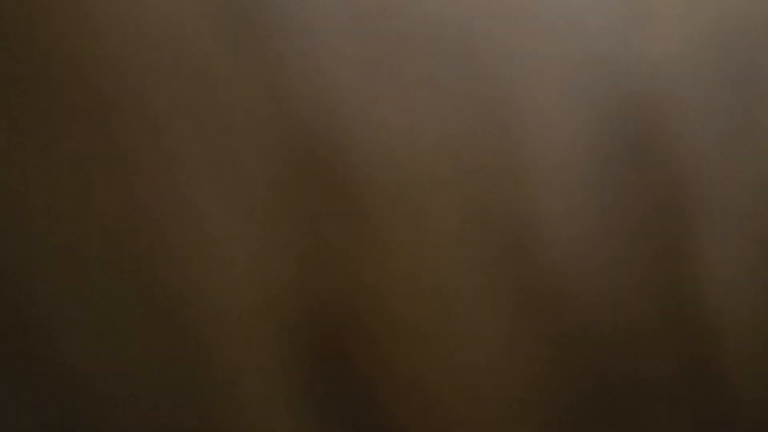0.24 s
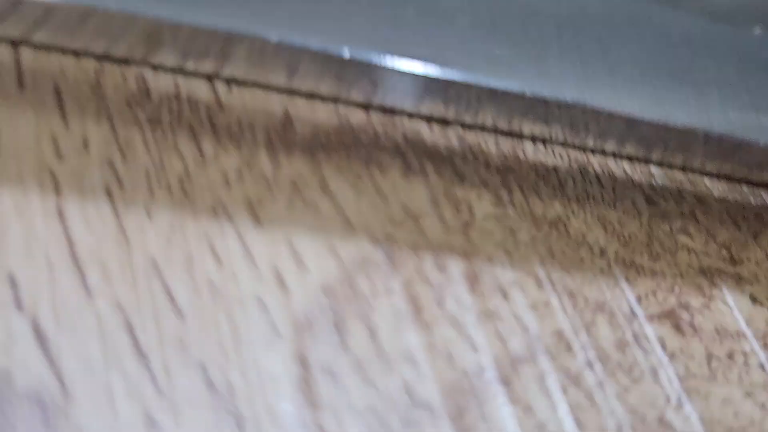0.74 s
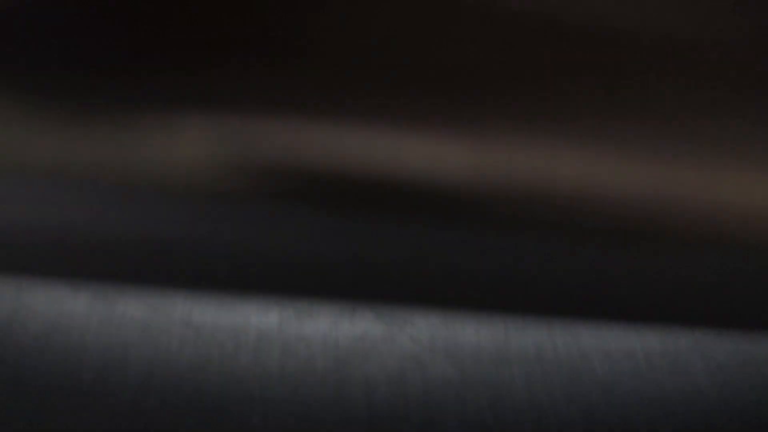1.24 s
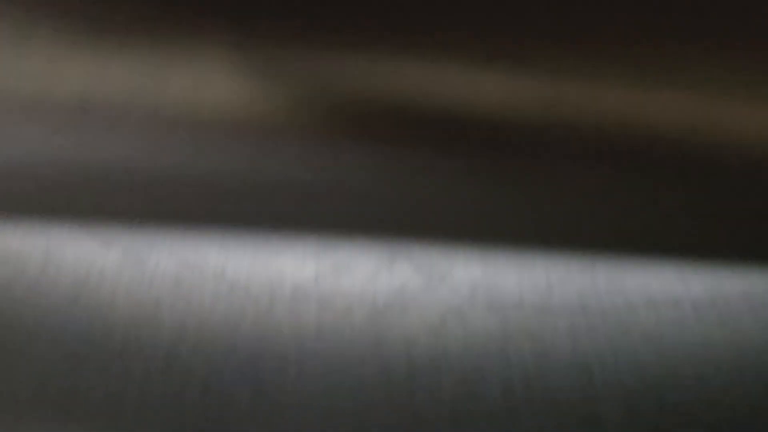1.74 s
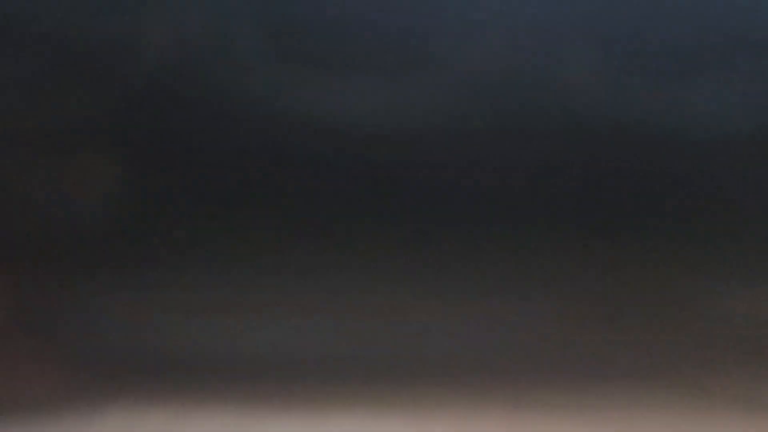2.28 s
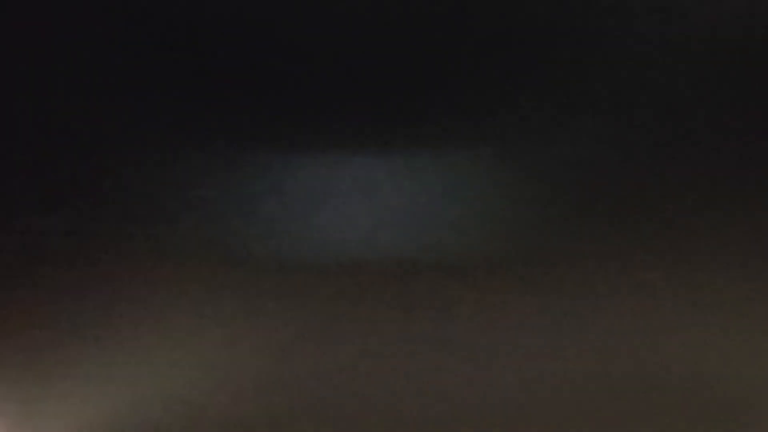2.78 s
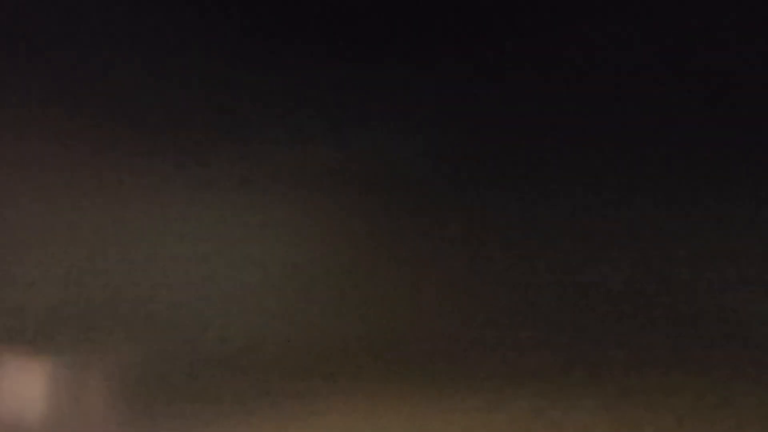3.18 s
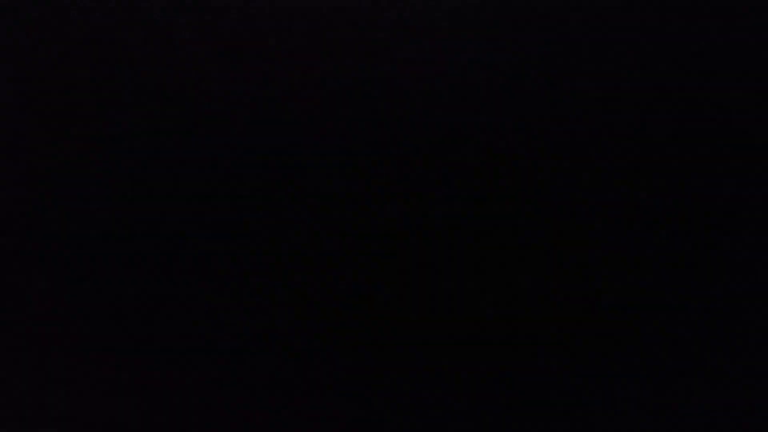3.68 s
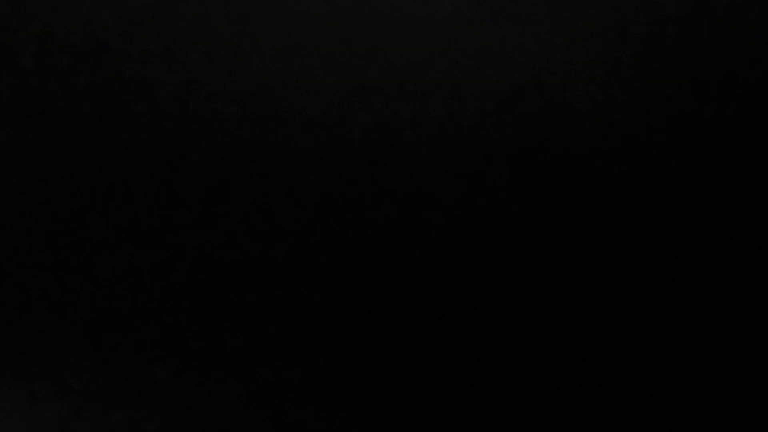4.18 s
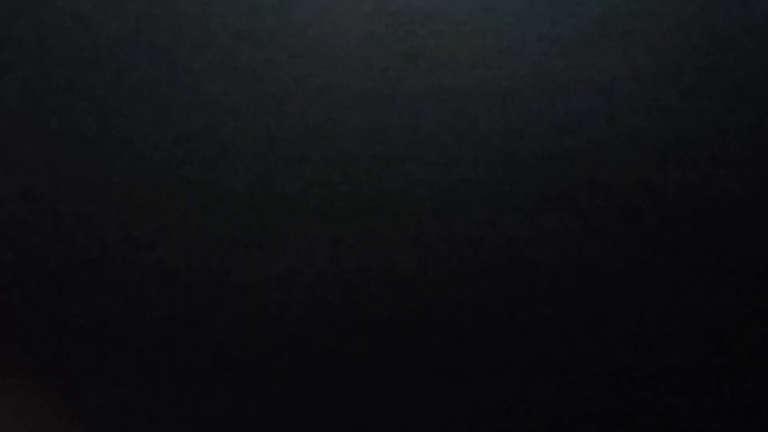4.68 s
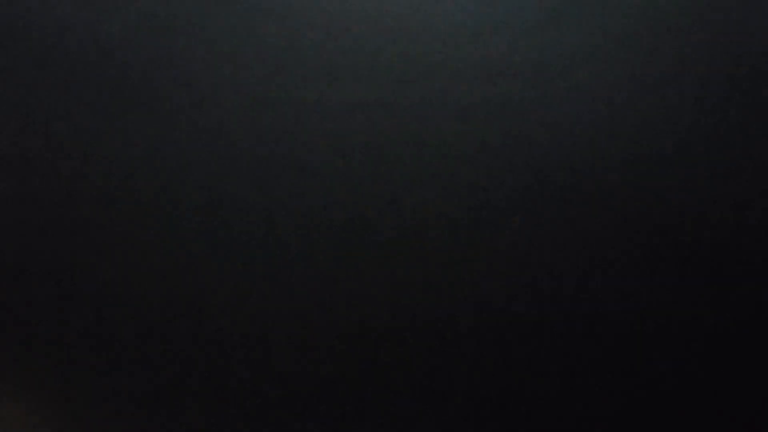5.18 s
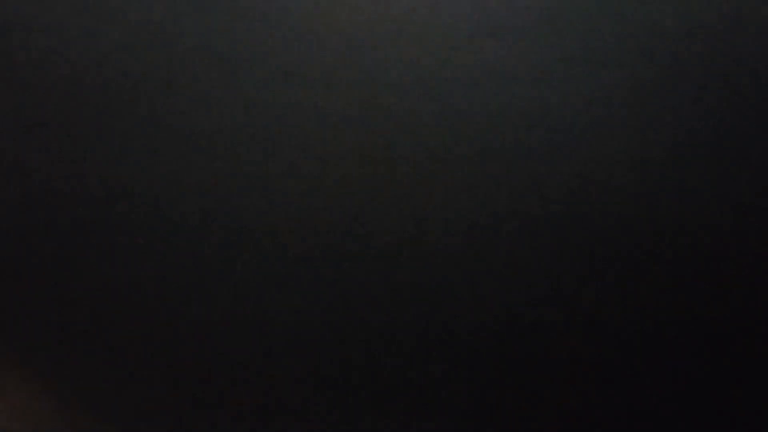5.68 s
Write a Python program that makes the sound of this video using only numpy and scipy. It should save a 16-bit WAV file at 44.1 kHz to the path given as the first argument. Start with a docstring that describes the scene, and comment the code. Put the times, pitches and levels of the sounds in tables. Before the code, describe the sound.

A low, slightly unsteady hum and soft room noise run throughout. From 0 to 0.4 s there is a faint grainy rub and a weak, airy squeak that rises then sinks; a modest hollow knock follows at 0.5 s. Soft strokes lead to a very heavy, close bump with a gritty clack at 1.2 s and a quick cluster of hard clacks around 1.45 s. Light rubbing continues, with a stronger scrape at 2.2 s, another overloading thud at 2.4 s and two bright, hard clacks at 2.6 to 2.7 s. It calms to faint rubbing, with dull bumps and a small rattle of hollow clacks at 3.5 to 3.75 s. Near quiet follows until a light double knock at 4.7 s. A sharp steel snap cracks at 5.04 s, a tiny springy tick comes at 5.55 s, and a crisper, brighter snap at 5.74 s, with short small-room reverberation.

```python
"""A soft rub and an airy squeak over a low hum, then hard bumps and clacks, and at last sharp snaps.
A camera is pushed in close to a metal gear shifter in a small room: friction is grainy noise in the
modes of its case, bumps are damped oscillations, clacks are brief noise exciting the housing's modes.
Then the shifter is moved by hand: its steel pawl snaps, ticks and snaps again, each time as a noise
crack with ringing steel and spring modes, and diffuse decaying noise answers as the room."""
import sys
import numpy as np
from scipy import signal
from scipy.fft import rfft, irfft, next_fast_len
from scipy.io import wavfile
from scipy.ndimage import map_coordinates

SR = 44100
rng = np.random.default_rng(int(sys.argv[2]) if len(sys.argv) > 2 else 0)


def master(y):
    """Save y as 16-bit WAV."""
    cut = np.clip(np.atleast_2d(y).T, -1, 1)
    pcm = np.round(cut * 32767)  # scale
    wavfile.write(sys.argv[1], SR, pcm.astype(np.int16))


N = 261599

# Dull bumps carried through the camera case:
# (time [s], level before colouring [dB], pitch [Hz], ring [cycles], left-right [dB])
BUMPS = [(.439, -32.5, 400, 0.17, 11), (0.5113, -31, 353, 0.38, -1.5), (.768, -43.5, 467, 1.6, 10),
         (1.2122, -1, 482, 0.97, -1.5), (1.232, -13.5, 377, 0.3, -8), (1.4635, -12.5, 500, 0.21, -1.5),
         (1.85, -26, 161, 0.24, 1), (2.4127, -1, 386, 0.46, -5.5), (2.432, -6, 310, 0.23, -4),
         (2.4387, -16.5, 223, 0.74, -8.5), (2.621, -4.5, 246, 0.26, 1), (2.6512, -9.5, 257.4, 0.13, 9.5),
         (3.502, -34.5, 201.6, 0.22, -21), (3.5405, -17, 168, 0.27, -3.5), (3.707, -20.5, 139, 0.11, -10),
         (3.723, -25, 110, 0.42, 14.5), (4.7126, -33, 303.5, 0.27, -3.5), (5.0382, -16.5, 368.8, 0.24, -9),
         (5.0494, -28.5, 139.7, 0.48, 3.5), (5.521, -39, 415, 0.71, 15.5), (5.552, -37, 158, .4, 4.5),
         (5.7381, -25.5, 188.6, 0.22, -8.5)]
# Slow sway of the case after each bump: (pitch [Hz], level after a 0 dB bump [dB], ring [cycles])
SWAY = [(57.4, -26, .5), (134.45, -20.5, 0.56)]
# Transmission of bumps and sway to the microphone: (frequency [Hz], level [dB])
BUMP_COLOUR = [(15, -28.0), (60, 0.5), (150, 3.5), (900, 1), (2500, -14.0), (8000, -18.0)]
# Hard contacts with the housing:
# (time [s], clack [dB], pitch [Hz], bright edge [dB], gritty hiss [dB], left-right [dB])
CLACKS = [(0.4382, -43, 860, -59.5, -57, 8), (0.5121, -19, 1390, -39.5, -41.5, 1.5),
          (1.007, -35, 856, -53.5, -48.5, 5), (1.2124, -20.5, 970, -38, -18.5, 15.5),
          (1.2328, -39, 916, -32, -42.5, -2.5), (1.4235, -39, 1500, -35.5, -39, 1),
          (1.4502, -16.5, 1370, -32.5, -30.5, 1), (1.4617, -13.5, 1300, -23.5, -26.5, 3.5),
          (1.4644, -14, 1284, -18, -21.5, 1), (2.413, -21.5, 940, -27.5, -26, 14),
          (2.62, -9, 1193, -16, -24.5, 6.5), (2.6505, -19.5, 950, -33.5, -41, 3),
          (2.6693, -9.5, 1325, -18.5, -32.5, 3), (3.501, -45, 900, -53, -55.5, -8.5),
          (3.609, -39.5, 1090, -62, -63.5, 3), (3.7228, -21, 1430, -43, -61.5, -9),
          (3.7265, -20.5, 1358, -45, -65, 4.5), (3.7373, -21, 1178, -39, -70, 0.5),
          (3.804, -46, 1063, -59, -79, -10), (4.7107, -21, 1125, -48.5, -57, 7),
          (4.7168, -26, 1277, -56, -52, 3), (4.754, -47, 980, -69, -56, 6),
          (5.0626, -28.5, 1350, -49, -65.5, -3.5)]
# Bright modes of the housing: (frequency [Hz], width [Hz], level [dB])
HOUSING_MODES = [(2273, 82, -2.5), (3160, 190, 2.5), (4040, 740, -2.5), (5100, 590, -1.5), (6496, 760, -11),
                 (8250, 870, -11.5)]
# Spectrum of the grit in a clack: (frequency [Hz], level [dB])
GRIT_COLOUR = [(2000, -29), (5000, -6.5), (8000, 0.5), (10000, -5), (12500, 1.5), (15000, -2),
               (16500, -24.5)]
# Snaps of the pawl: (time [s], crack [dB], t60 of the crack's noise [s], ping of the small spring [dB],
# left-right [dB], room [dB], brightness limit of the crack [Hz])
SNAPS = [(5.0405, -12.5, 0.017, -28, 1.5, -11, 8000), (5.5524, -39.5, 0.032, -32, 10, -15.5, 4510),
         (5.737, -12, 0.0091, -27, 0, -6, 15100)]
# Spectrum of the bare crack: (frequency [Hz], level [dB])
CRACK_COLOUR = [(150, -16.5), (450, -3), (900, 8.5), (2000, -1.5), (4500, 3), (6500, -3), (8500, -3),
                (10000, -10), (12500, -4.5), (15500, -2), (16500, -10.5)]
# Modes of the shifter's steel: (frequency [Hz], width [Hz], level [dB])
STEEL_MODES = [(1060, 280, -1), (1617, 200, -9), (2450, 53, -7.5), (3583, 120, 2.5), (4590, 160, 1),
               (4190, 130, -13), (4780, 170, -2.5), (5250, 150, -1), (6280, 91, -4.5), (6680, 43, -10.5),
               (7100, 460, -14.5), (8190, 100, 3), (10710, 300, -3.5), (12300, 300, -14), (15040, 300, 0)]
# Modes of the small spring: (frequency [Hz], width [Hz], level [dB])
SPRING_MODES = [(9500, 44, -2.5), (11300, 1200, -5), (14300, 780, -13.5)]
# Strokes of case and fingers over the housing:
# (time [s], held [s], fade [s], rub [dB], rub pitch [Hz], hiss [dB])
STROKES = [(0, 0.052, 0.072, -56.5, 707, -59), (.445, 0.063, 0.031, -50.5, 884, -67),
           (0.914, 0.028, 0.12, -47, 924, -61.5), (1.015, 0.11, 0.047, -45.5, 796, -57.5),
           (1.18, 0.034, 0.074, -39.5, 885, -46), (1.331, 0.022, 0.047, -45.5, 1240, -52.5),
           (1.424, 0.029, 0.044, -46.5, 1100, -52.5), (1.56, 0.26, 0.049, -62, 743, -67),
           (1.886, 0.014, 0.042, -42, 986, -59.5), (1.995, 0.013, 0.082, -45, 782, -58.5),
           (2.21, 0.03, 0.096, -33.5, 1190, -58), (2.411, 0.035, 0.18, -52.5, 1102, -60),
           (2.595, 0.054, 0.071, -34, 1060, -53), (2.915, 0.019, .07, -60.5, 700, -72),
           (3.164, 0.015, 0.05, -70, 895, -59.5), (3.255, 0.28, 0.022, -64.5, 890, -61),
           (3.55, 0.17, 0.055, -43.5, 1054, -62.5), (3.81, 0.022, 0.035, -48, 1016, -70),
           (3.88, 0.24, 0.081, -67.5, 921, -73), (4.435, 0.064, .08, -65, 950, -66),
           (4.705, 0.053, 0.064, -53.5, 945, -57.5), (5.521, 0.0075, 0.053, -43, 761, -63)]
# Modes of the rubbed case at the pitch CASE_HZ: (frequency [Hz], width [Hz], level [dB])
CASE_MODES = [(565, 210, -1.5), (802, 390, -4.5), (950, 200, -1), (1175, 240, -4), (1460, 130, -4.5),
              (2070, 160, -12), (3870, 810, -9)]
# Spectrum of the rasp: (frequency [Hz], level [dB])
RASP_COLOUR = [(1200, -3), (2000, 2.5), (2700, -4.5), (3500, -2), (4200, -2.5), (5200, -4.5), (7000, -13),
               (10000, -26.5)]
# Spectrum of the fine hiss: (frequency [Hz], level [dB])
HISS_COLOUR = [(3500, -23), (5500, -1.5), (8500, -0.5), (10500, -4.5), (13000, 2), (15500, -1),
               (16500, -23)]
# Course of the squeak: (time [s], pitch [Hz], level [dB])
SQUEAK = [(.05, 1710, -78), (.12, 1764, -72), (.209, 1860, -65), (0.281, 1660, -68), (.33, 1330, -69),
          (.37, 1150, -80)]
# Reverberation time of the room: (frequency [Hz], t60 [s])
ROOM_T60 = [(150, .27), (1000, 0.24), (4500, 0.27), (9000, 0.24), (15000, 0.097)]
# Colour of the reflections: (frequency [Hz], level [dB])
WALL_COLOUR = [(100, 0.5), (500, -1), (950, 1.5), (1700, -7), (3500, -2.5), (6500, -1.5), (8500, 0),
               (10000, -3), (15000, -1.5)]
# Spectrum of the room noise: (frequency [Hz], level [dB])
AIR_COLOUR = [(15, -26), (40, -6.5), (70, -3.5), (120, -6), (160, -9), (260, -12.5), (320, -20.5),
              (550, -23), (1000, -34), (1300, -39.5), (4000, -49.5), (5000, -43), (6500, -58.5),
              (16000, -72.5)]
# Tones of the hum: (frequency [Hz], mean level [dB])
HUM = [(118.4, -53.5), (247.6, -69.5)]

SWAY_GROWTH = 0.71  # dB of sway per dB of bump: the grip holds back the hardest blows
CHATTER_T60_S = 0.017  # how long a hard contact chatters
RING_DB = 0.5  # the steel's ring against the crack
CASE_HZ = 1166  # the rub pitch at which the case rings with its listed modes
FADE_DB, ATTACK_SHARE = 21, .75  # drop within the fade time; swelling takes this share of that time
PUSH_DB = 1  # the rub grows by this much while the stroke is held
UNEVEN_DB, UNEVEN_PER_S = 3.9, 23  # the hand's pressure wavers
RASP_DB = -4  # against the mean level of rub and hiss
HISS_STEEPNESS = 1.15  # the hiss comes and goes faster than the rub
CATCHES_PER_S, CATCH_DB = 22, 5  # ticks as the surfaces snag; level against the rub
HUM_WAVER_DB = 1.5
TOP_HZ = 16300  # band limit of the camera


def amp(db):
    """Level in decibels to linear gain."""
    return 10 ** (np.asarray(db) / 20)


def unit(x):
    """Normalisation to rms 1."""
    return x / np.sqrt(np.mean(x ** 2) + 1e-20)


def along(points, hz):
    """Interpolation of (Hz, value) points on a logarithmic frequency axis."""
    f, v = np.transpose(points)
    return np.interp(np.log(hz + 1), np.log(f + 1), v)


def filtered(x, response):
    """Linear filtering: the spectrum of x times a complex response of frequency."""
    size = 2 * next_fast_len(x.shape[-1] // 2 + 4096)
    hz = np.fft.rfftfreq(size, 1 / SR)
    return irfft(rfft(x, size) * response(hz), size)[..., :x.shape[-1]]


def colour(points):
    """Minimum phase: the causal response with a given (Hz, dB) shape, by folding its cepstrum."""
    def response(hz):
        cepstrum = irfft(np.log(amp(along(points, hz))))
        half = len(cepstrum) // 2
        cepstrum[1:half] *= 2
        cepstrum[half + 1:] = 0
        return np.exp(rfft(cepstrum))
    return response


def modes(rows):
    """Modal superposition: second-order (Hz, width, dB) resonances with alternating sign."""
    def response(f):
        total = 0
        for k, (centre, width, db) in enumerate(rows):
            damping = 1j * f * width
            total = total + (-1) ** k * amp(db) * damping / (centre * centre - f * f + damping)
        return total
    return response


def wobble(rate, size=N):
    """Band-limited fluctuation: a smooth random curve with rate knots a second."""
    knots = rng.standard_normal(int(size * rate / SR) + 4)
    return map_coordinates(knots, [np.arange(size) * rate / SR])


def pair(size, side_db):
    """Partial coherence: white noise at two ports, a shared part and an opposed part."""
    mid, side = rng.standard_normal((2, size))
    return np.array([mid + amp(side_db) * side, mid - amp(side_db) * side])


def add(track, s, sound, pan_db):
    """Superposition: mix a sound in at time s, leaning left by pan_db."""
    part = track[:, round(s * SR):][:, :sound.shape[-1]]
    gains = amp([[pan_db / 2], [-pan_db / 2]])
    part += (gains * sound)[:, :part.shape[1]]


def swing(hz, cycles):
    """Damped oscillation: a few cycles of the case, reaching the far (right) port a moment later."""
    t = np.maximum(np.arange(SR // 6) / SR - np.array([[0], [.0003]]), 0)
    age = t * hz / cycles
    envelope = 2 * age * np.exp(1 - 2 * age)  # peaks at 1
    return -envelope * np.sin(2 * np.pi * hz * t)


def bumps():
    """Impulse response of a held body: each bump swings the case at its own pitch and leaves it swaying."""
    out = np.zeros((2, N))
    sway = sum(amp(db) * swing(hz, cycles) for hz, db, cycles in SWAY)
    for s, db, hz, cycles, pan_db in BUMPS:
        bump = amp(db) * swing(hz, cycles)
        add(out, s, bump + amp(SWAY_GROWTH * db) * sway, pan_db)
    return filtered(out, colour(BUMP_COLOUR))


def burst(t60, response, side_db):
    """Impact excitation: brief chatter into a resonant body, with the energy of 2 ms at rms 1."""
    t = np.arange(SR // 10) / SR
    chatter = pair(len(t), side_db) * amp(-60 * t / t60)
    ring = filtered(chatter, response)
    return ring / np.sqrt(np.sum(ring ** 2, axis=1, keepdims=True) / (.002 * SR))


def hollow(hz):
    """Low-Q resonance: the housing's broad, hollow mode, applied twice."""
    return lambda f: modes([(hz, .7 * hz, 0)])(f) ** 2


def clacks():
    """Modal excitation by impact: one hollow resonance, the housing's brighter modes and a spit of grit."""
    out = np.zeros((2, N))
    for s, db, hz, edge_db, grit_db, pan_db in CLACKS:
        clack = amp(db) * burst(CHATTER_T60_S, hollow(hz), side_db=3)
        edge = amp(edge_db) * burst(0.82 * CHATTER_T60_S, modes(HOUSING_MODES), side_db=0.5)
        grit = amp(grit_db) * burst(.7 * CHATTER_T60_S, colour(GRIT_COLOUR), side_db=1.0)
        add(out, s, clack + edge + grit, pan_db)
    return out


def snaps():
    """Impact and radiation: the pawl's crack, the steel's ring and the spring's ping fill the room."""
    out = np.zeros((2, N))
    for s, db, t60, ping_db, pan_db, room_db, bright_hz in SNAPS:
        def contact(f):
            return colour(CRACK_COLOUR)(f) / (1 + 1j * f / bright_hz)  # a slower contact is duller
        crack = amp(db) * burst(t60, contact, side_db=-5.5)
        ring = amp(db + RING_DB) * burst(0.72 * t60, modes(STEEL_MODES), side_db=1.5)
        ping = amp(ping_db) * burst(0.013, modes(SPRING_MODES), side_db=-0.5)
        add(out, s, crack + ring + ping, pan_db)
        radiated = crack + amp(-8) * ring + ping  # the crack carries farthest
        radiated = np.pad(radiated, ((0, 0), (0, SR // 3)))  # time for the tail
        add(out, s, amp(room_db) * room(radiated), 0)
    return out


def friction(size, response, grain_db, grain_rate, side_db):
    """Stick-slip: surfaces catch and slip as noise in uneven grains, rms 1."""
    grains = amp(grain_db * np.clip(wobble(grain_rate, size), -2, 2))
    return unit(filtered(pair(size, side_db) * grains, response))


def strokes():
    """Sliding friction: each stroke swells, holds and fades as ringing case, rasp and fine hiss."""
    out, rasp, hiss = np.zeros((3, 2, N))
    for s, held, fade, rub_db, hz, hiss_db in STROKES:
        start = max(s - .15, 0)  # room for the swell
        t = start - s + np.arange(SR // 2) / SR
        swell_db = FADE_DB / fade * (np.minimum(t / ATTACK_SHARE, 0) - np.maximum(t - held, 0))
        push_db = PUSH_DB * (np.clip(t / held, 0, 1) - .5)
        press_db = swell_db + push_db + UNEVEN_DB * wobble(UNEVEN_PER_S, len(t))

        def case(f):
            muffling = 1 + (f / (2.3 * hz)) ** 4  # the case muffles what lies above its modes
            return modes(CASE_MODES)(f * CASE_HZ / hz) / muffling
        rub = friction(len(t), case, grain_db=4.0, grain_rate=260, side_db=0.5)
        add(out, start, amp(rub_db + press_db) * rub, 0)
        # envelopes of the rasp, which grows with rub and hiss, and of the hiss
        add(rasp, start, amp((rub_db + hiss_db) / 2 + RASP_DB + press_db), 0)
        add(hiss, start, amp(hiss_db + HISS_STEEPNESS * swell_db), 0)
    out += rasp * friction(N, colour(RASP_COLOUR), grain_db=1.0, grain_rate=650, side_db=0.5)
    out += hiss * friction(N, colour(HISS_COLOUR), grain_db=2.5, grain_rate=3400, side_db=0)
    return out


def catches():
    """Random micro-impacts: while a stroke is held, the surfaces snag with tiny hollow ticks."""
    out = np.zeros((2, N))
    for s, held, _, rub_db, hz, _ in STROKES:
        count = int(np.ceil(CATCHES_PER_S * held))
        for when, size in rng.random((count, 2)):
            tick = burst(.008, hollow(hz), side_db=0)
            add(out, s + when * held, size * amp(rub_db + CATCH_DB) * tick, 0)
    return out


def squeak():
    """Narrow-band noise on a gliding carrier: a faint squeak that rises, then sinks as the sliding slows."""
    t = np.arange(N) / SR
    s, hz, db = np.transpose(SQUEAK)
    phase = 2 * np.pi * np.cumsum(np.interp(t, s, hz)) / SR
    narrow = wobble(380) * np.sin(phase) + wobble(380) * np.cos(phase)
    return np.interp(t, s, amp(db), left=0, right=0) * narrow


def room(x):
    """Diffuse reverberation: convolution with noise whose frequencies each die at their own speed."""
    hz, t, z = signal.stft(rng.standard_normal((2, SR // 2)), SR, nperseg=256)
    decay_db = along(WALL_COLOUR, hz)[:, None] - 60 * t / along(ROOM_T60, hz)[:, None]
    tail = signal.istft(z * amp(decay_db), SR, nperseg=256)[1]
    tail = tail * (1 - np.exp(-np.arange(tail.shape[1]) / SR / 0.0014))  # reflections build up
    return signal.fftconvolve(x, tail / np.linalg.norm(tail[0]), axes=1)[:, :x.shape[1]]


def background():
    """Stationary noise and tones: low room noise and a slightly unsteady hum."""
    t = np.arange(N) / SR
    air = amp(-52) * unit(filtered(pair(N, side_db=-6.0), colour(AIR_COLOUR)))
    hum = 0
    for hz, db in HUM:
        level = amp(db + HUM_WAVER_DB * wobble(3))
        hum = hum + level * np.sin(2 * np.pi * hz * t + 0.26 * wobble(7.7))
    return air + hum


def scene():
    """Near-field superposition: blows on the case reach the microphone almost dry."""
    bump, clack = bumps(), clacks()
    blow_echo = room(amp(-22.0) * clack + amp(-26) * bump)
    handling = strokes() + catches() + squeak()
    return bump + clack + blow_echo + snaps() + handling + background()


def record(dry):
    """Saturation and band limiting: the loudest blows overload the camera, which cuts steeply at its top."""
    clipped = dry / (1 + np.abs(dry) ** 8) ** (1 / 8)
    return filtered(clipped, lambda hz: 1 / (1 + (hz / TOP_HZ) ** 120))


dry = scene()
out = record(dry)
master(out)
```